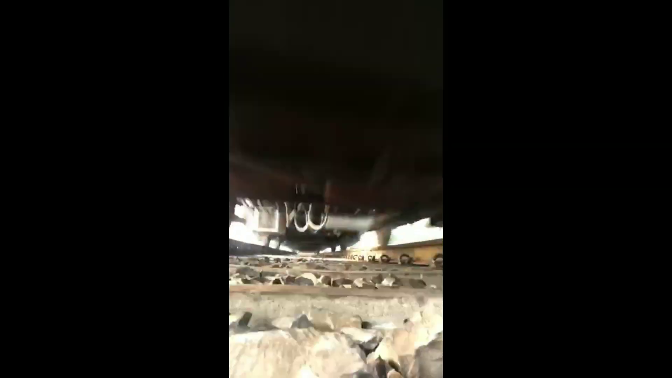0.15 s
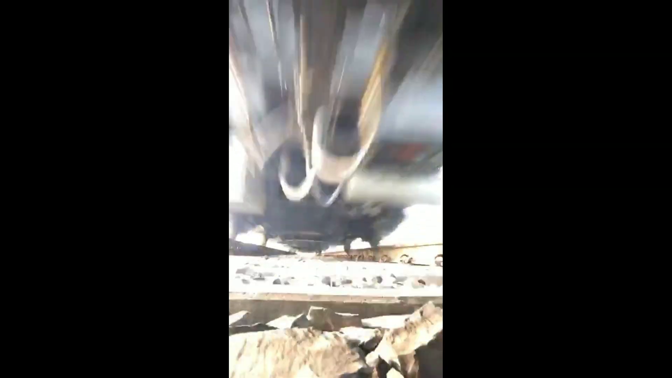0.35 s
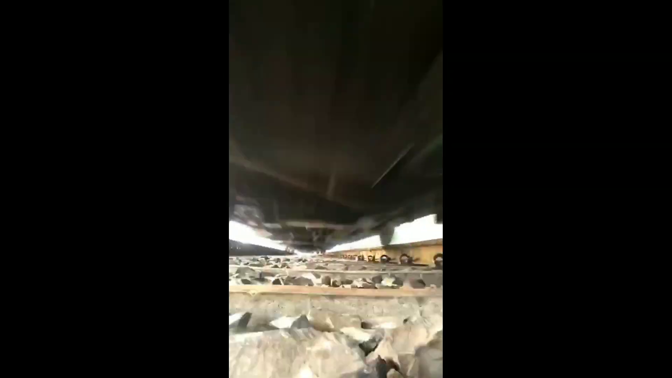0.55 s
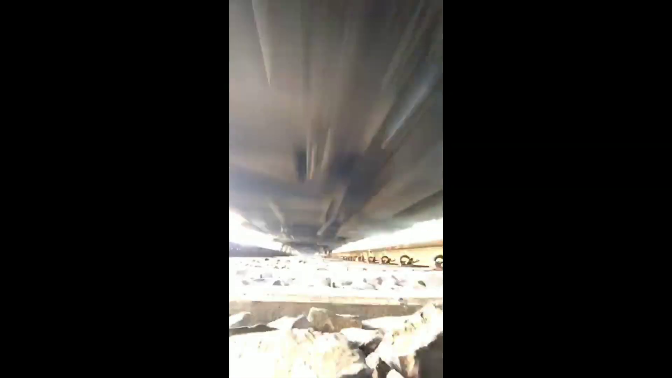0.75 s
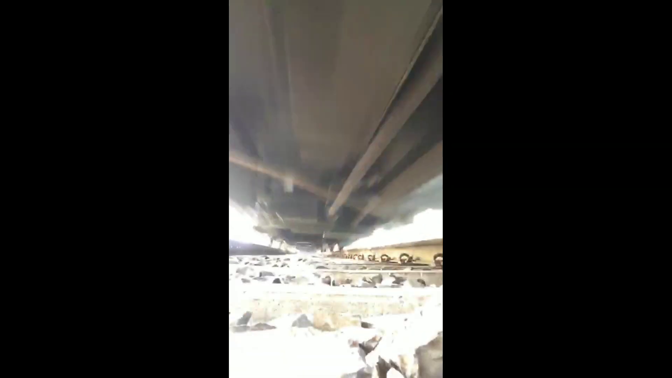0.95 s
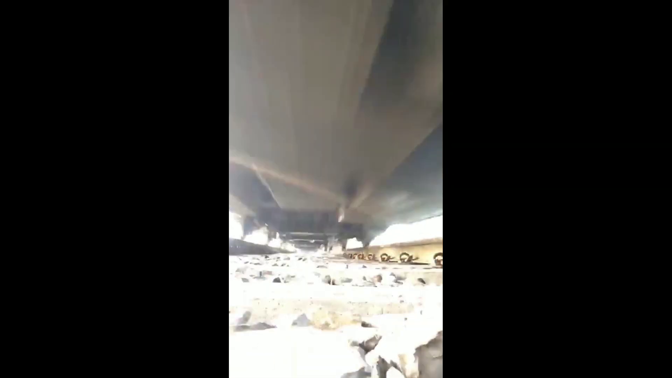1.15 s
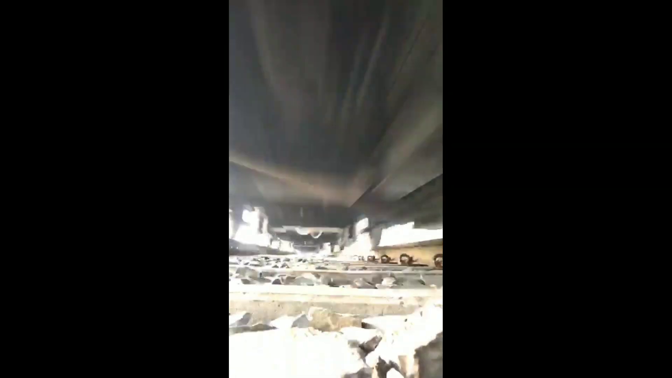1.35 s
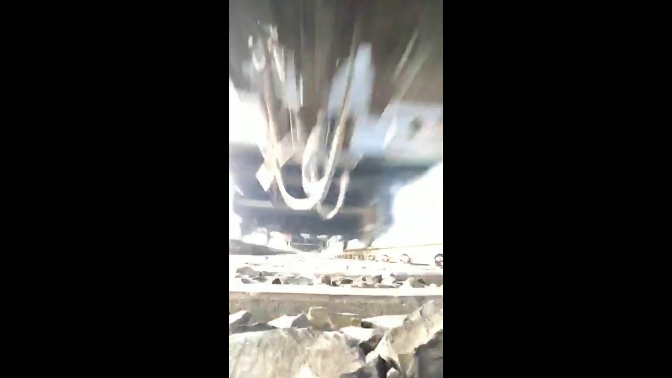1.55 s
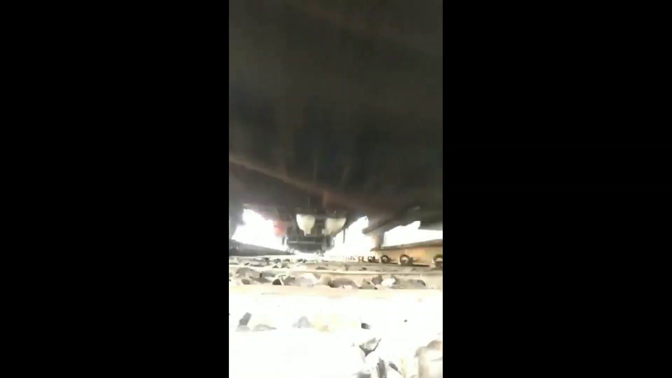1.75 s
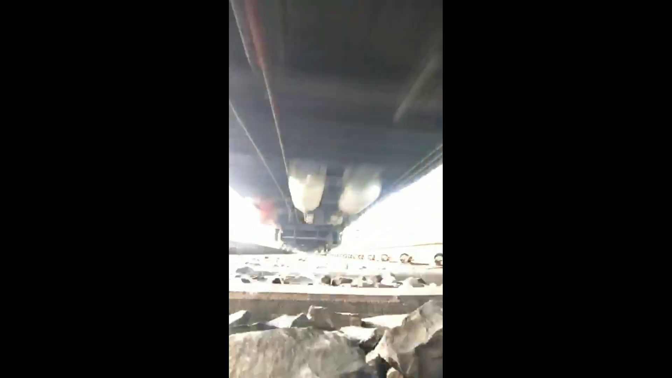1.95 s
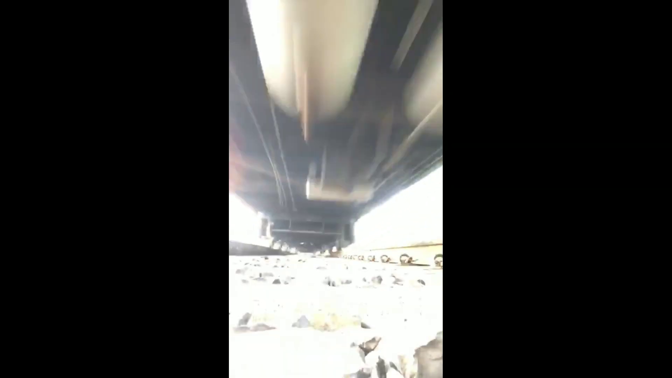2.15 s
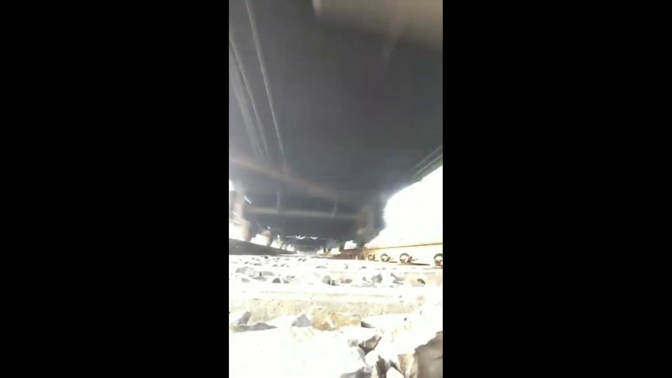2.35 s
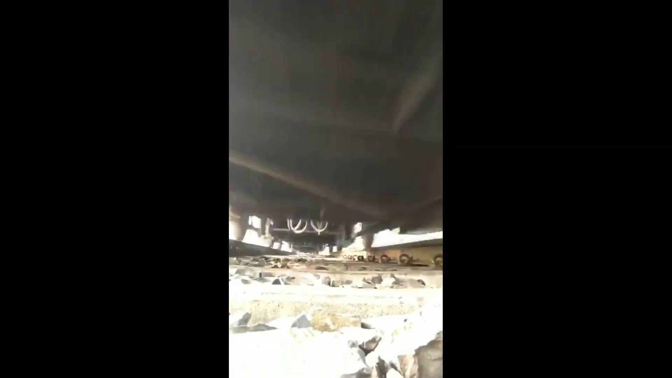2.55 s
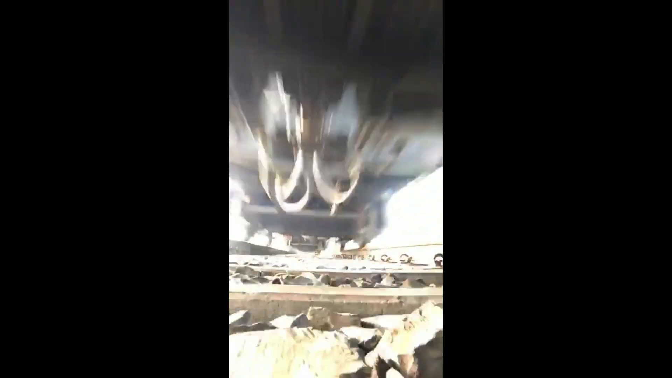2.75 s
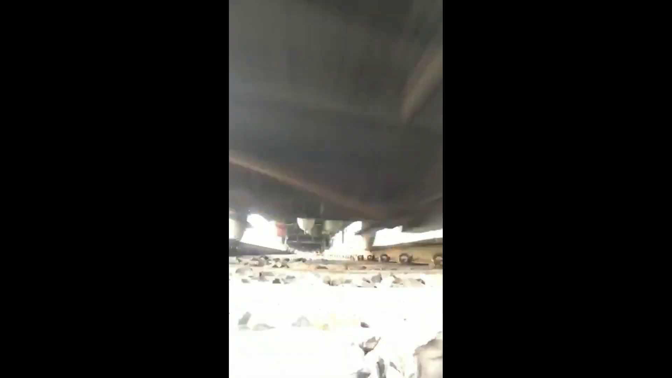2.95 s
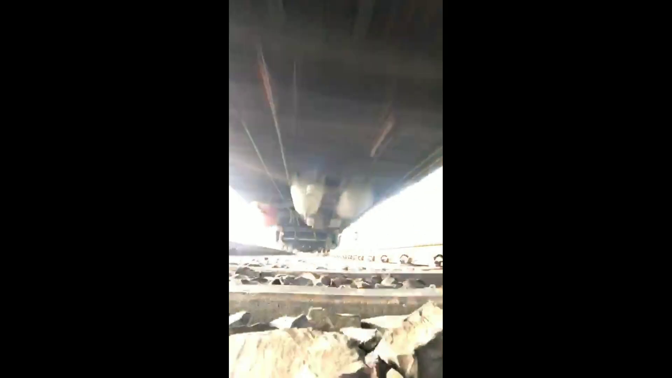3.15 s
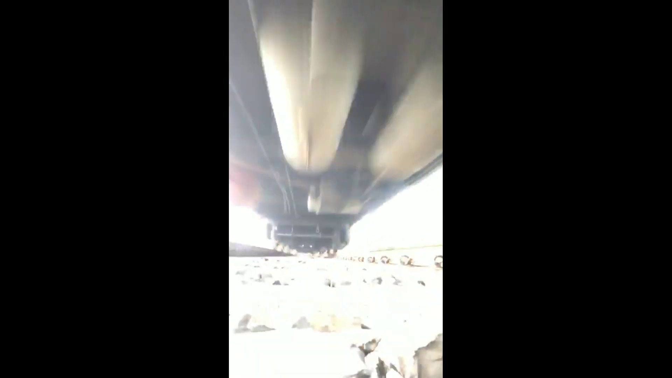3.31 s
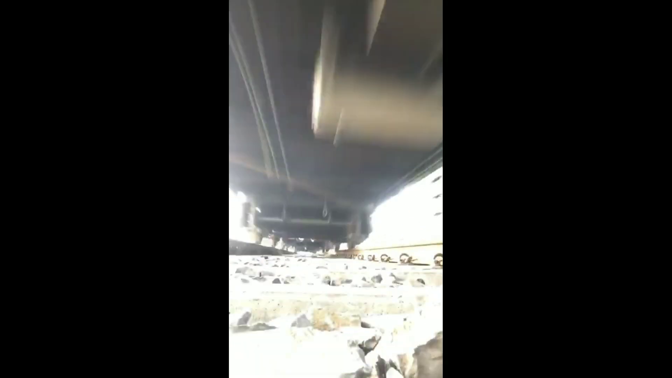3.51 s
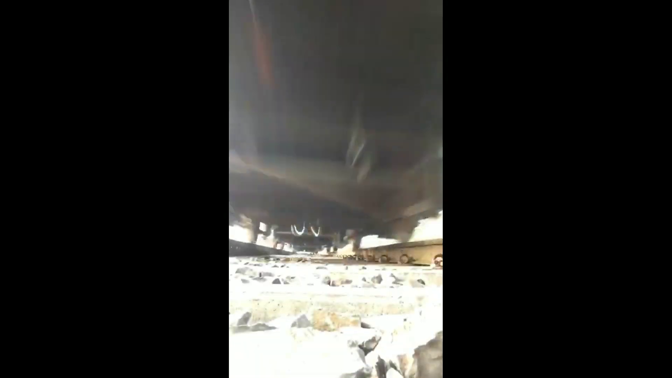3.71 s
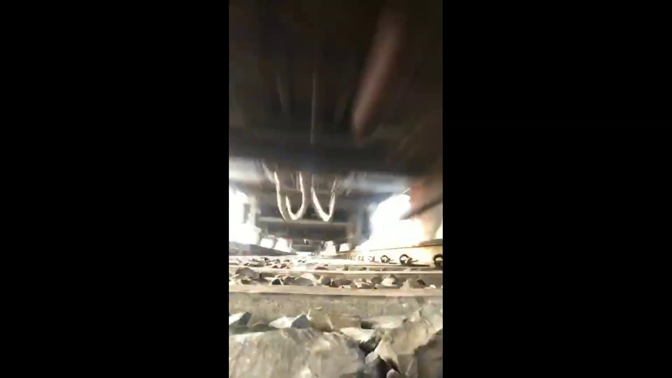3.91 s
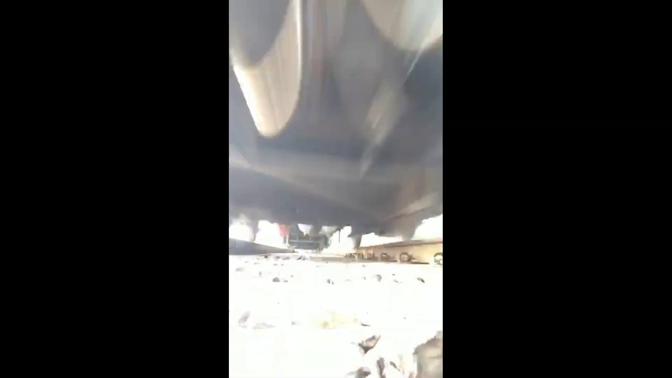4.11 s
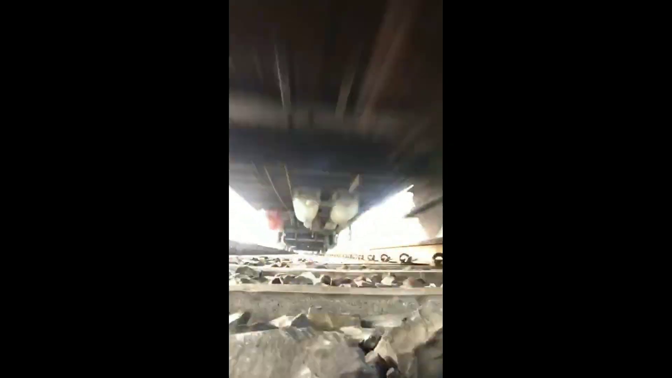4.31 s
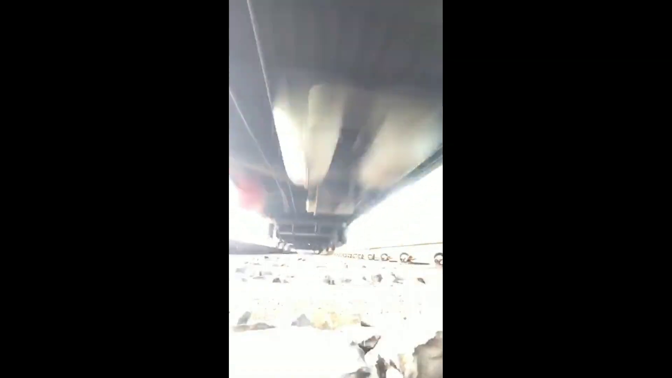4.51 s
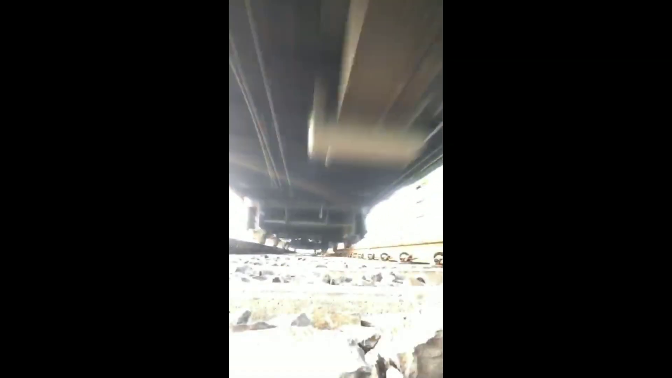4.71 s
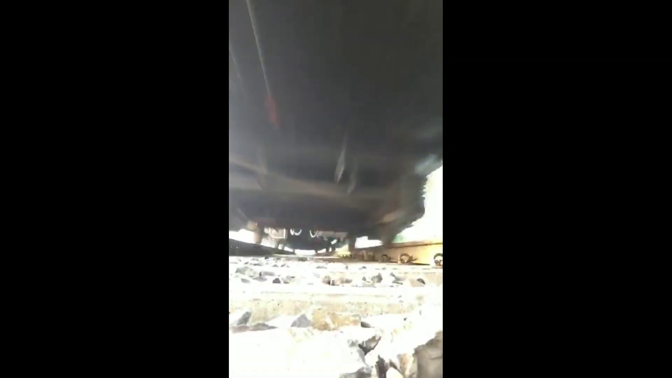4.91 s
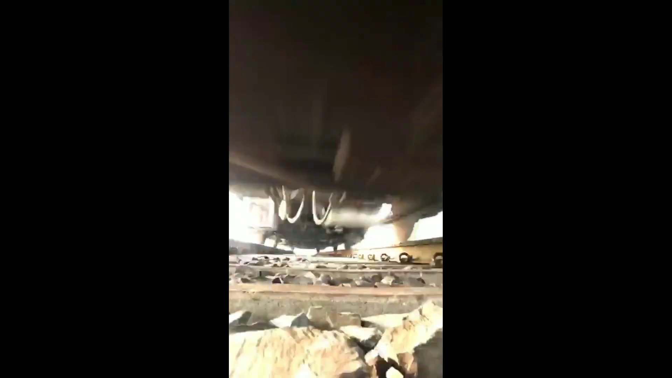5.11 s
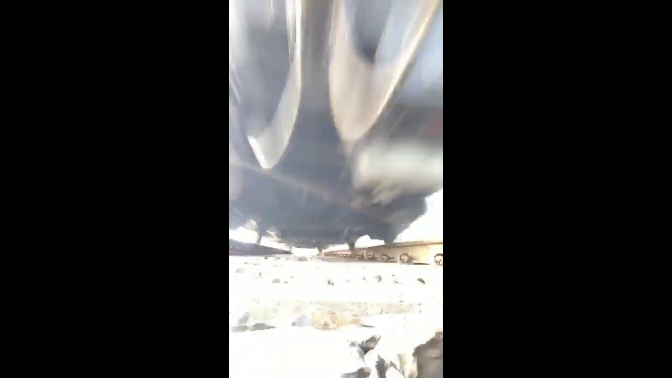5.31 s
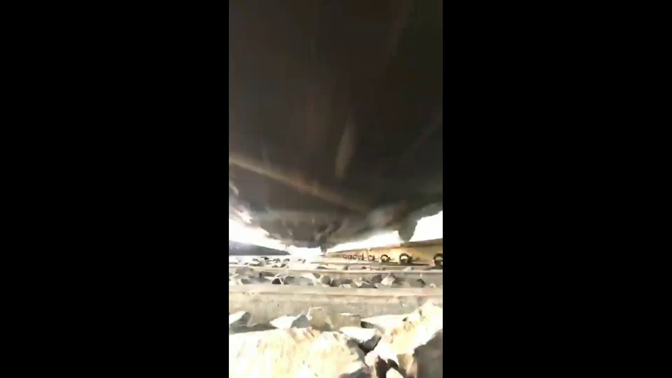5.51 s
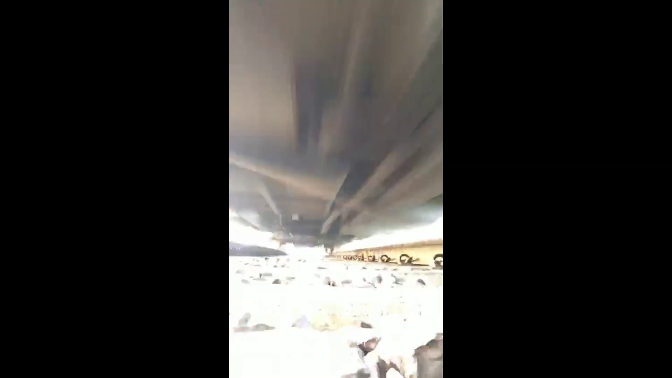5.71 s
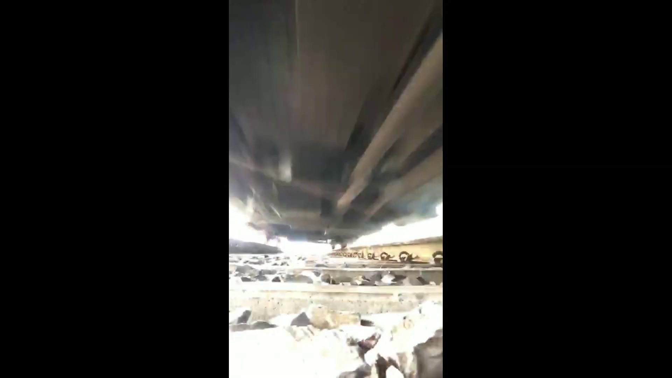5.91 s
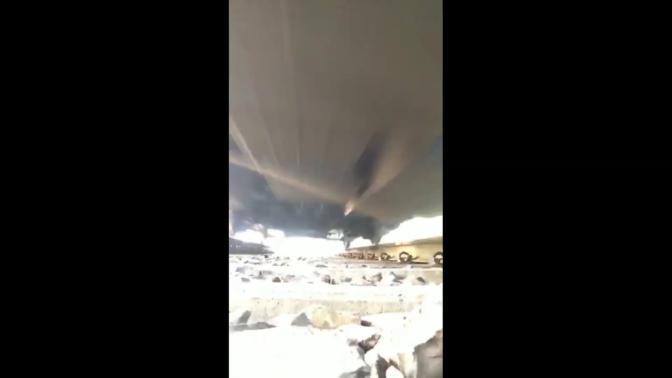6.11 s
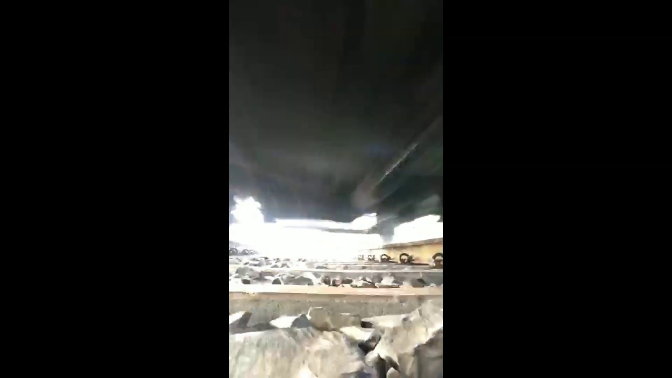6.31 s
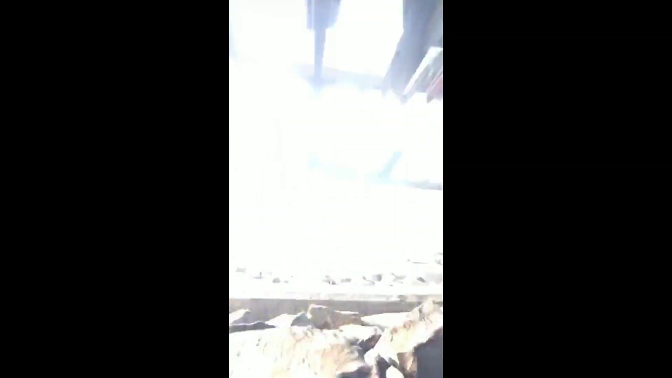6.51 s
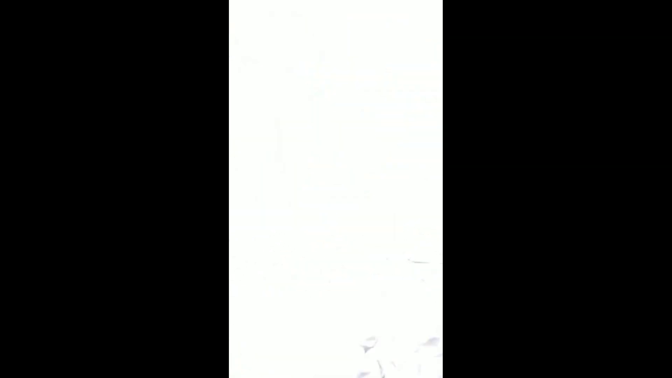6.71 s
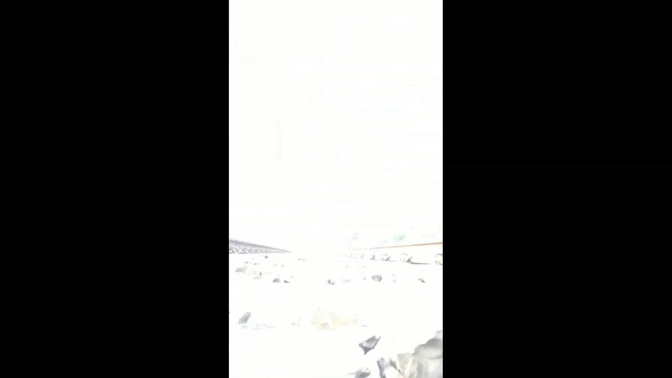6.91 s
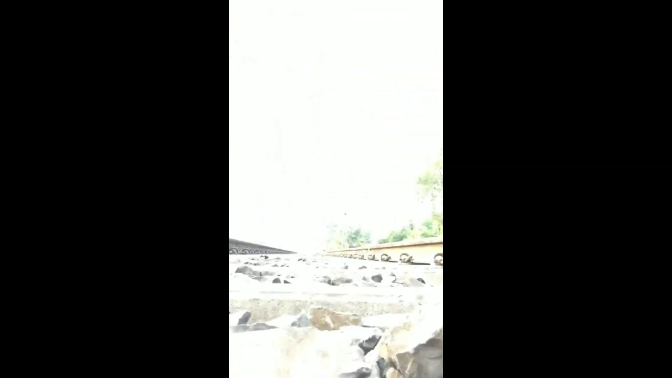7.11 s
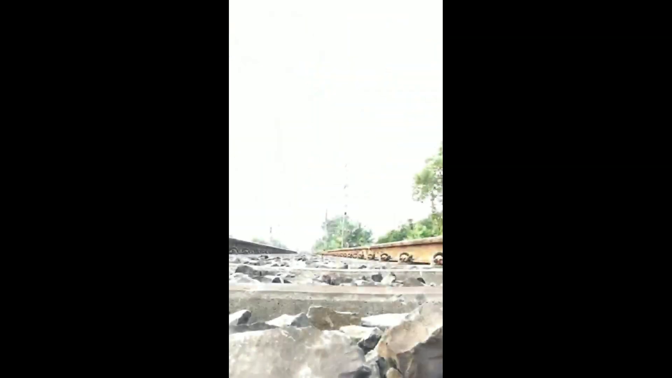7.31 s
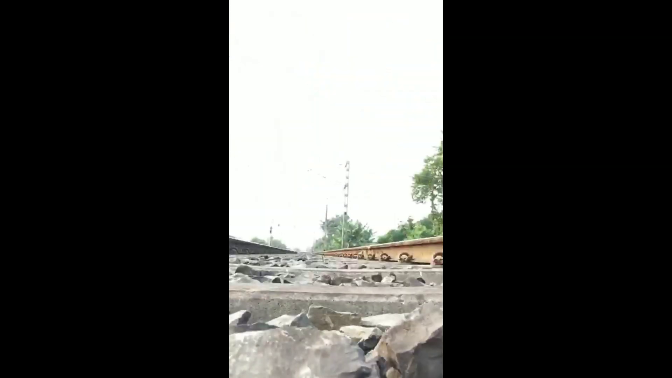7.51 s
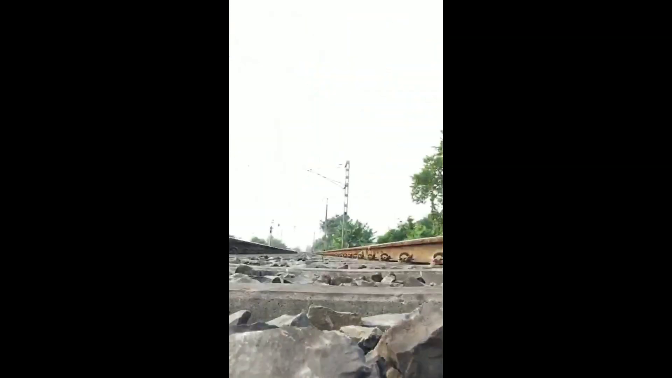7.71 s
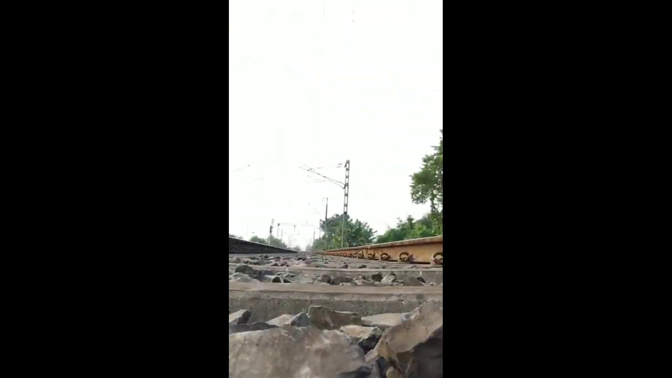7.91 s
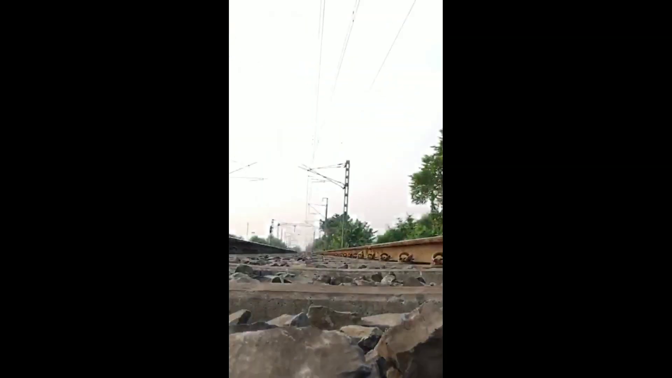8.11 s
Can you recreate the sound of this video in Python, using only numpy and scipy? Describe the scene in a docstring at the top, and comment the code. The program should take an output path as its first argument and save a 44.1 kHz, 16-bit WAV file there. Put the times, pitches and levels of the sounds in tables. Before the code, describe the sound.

An electric commuter train is already passing over a microphone between the rails outdoors. Low air rumble and rolling roar swell before the first hard steel clacks at 0.4 and 0.55 seconds, then 0.8 and 0.95. Similar groups of four blows begin around 1.6, 2.85, 4.05 and 5.3 seconds, each blow brief, ringing and close enough to overload slightly. Dull knocks from farther joints surround them. Roar, metallic singing and hiss surge with each bogie and dip between. A short rough flange squeal peaks near 0.7, another abruptly at 5.8, sagging as the wheel passes. Motor growls deepen around 0.7, 1.5, 5.7 and 6.5; a quick air rush comes at 5.2, a softer one near 6.2. Last clacks fall at 6.55 and 6.7. The train noise drops away; from 7.0 to 7.9 low wake thumps, puffs and dry ticks weaken, leaving residual rumble and faint hiss.

```python
"""A roar of rolling wheels swells over a low rumble, then axle after axle of an electric commuter train
strikes a rail joint close to a microphone between the rails. Decaying steel modes and noise make the blows,
shaped noise the roar, hiss and draught, sines the knocks, and rough partials two short flange squeals.
Motor bogies growl in noise bands; when the last coach has gone, low pushes and puffs of its wake buffet
the microphone and dry ticks sound. A limiter holds down the blows."""
import sys
import numpy as np
from scipy import signal
from scipy.fft import rfft, irfft, next_fast_len
from scipy.io import wavfile
from scipy.ndimage import uniform_filter1d

SR = 44100
rng = np.random.default_rng(int(sys.argv[2]) if len(sys.argv) > 2 else 0)


def pcm_store(signal):
    """Save signal as 16-bit PCM."""
    levels = np.round(np.clip(np.atleast_2d(signal), -1, 1) * 32767)
    wavfile.write(sys.argv[1], SR, levels.astype(np.int16).T)


N = 359415
TIME = np.arange(N) / SR

# Bogies, in pairs either side of each coupling. Each row: time in seconds when the leading axle strikes
# the near joint, relative force in dB, relative roar in dB, relative hiss in dB.
BOGIES = [(0.385, -2.5, -21.5, -42.5), (0.776, 1.5, -18.5, -42), (1.609, -4.5, -18.5, -41.5),
          (2.001, 3.5, -21.5, -46.5), (2.837, -3.5, -21.5, -44.5), (3.230, 3, -20.5, -45),
          (4.066, -3.5, -20.5, -45), (4.461, 2, -20.5, -46), (5.301, -2.5, -21.5, -44),
          (5.697, 0.5, -18.5, -42.5), (6.539, -6, -18, -42.5)]
AXLE_GAP_S = 0.166  # from a bogie's leading axle to its trailing one
# The four axles round a coupling, in turn. Each row: relative force in dB, treble lift in dB,
# 60 dB decay time of the ring in seconds, relative force on the farther joints in dB.
AXLES = [(1, -3.5, 0.064, 0.5), (-4, -3, 0.071, -6.5), (-2, 0.5, 0.073, -6.5), (-3.5, 0, 0.063, -7)]
# Modes of rail and wheel. Each row: nominal frequency in Hz, relative level in dB under a leading axle,
# relative level in dB under a trailing axle.
RAIL_MODES = [(148, -14.5, 6), (274.7, -0.5, 0.5), (597.6, 2, -11.5), (664, -26.5, -2), (832, -8.5, 0),
              (872, -1, -2.5), (910, -6.5, 3.5), (997, -3, -31), (1106.5, -13, 1), (1139.5, -10, 3),
              (1750, -11, -27.5), (1975, -8.5, -13), (2227, -18, -8.5), (2343, -8, -18.5), (2685, -8, -13),
              (3640, -13.5, -22.5), (5200, -18, -28.5), (6680, -17, -23), (9030, -21.5, -17)]
# Spectrum of the dense ringing. Each row: frequency in Hz, relative density in dB per Hz.
CLANG_SPECTRUM = [(40, -13), (120, 0.5), (280, -3.5), (430, -7.5), (620, -3), (1130, -0.5), (1420, -15.5),
                  (2400, -13), (3800, -16.5), (4800, -23), (6400, -24), (11500, -33)]
# The wheel bounces on the rail end, each time weaker.
BOUNCE_S, BOUNCE_DB, THUMP_HZ, THUMP_DB = 0.00771, -2, 192, -4.5
# Farther joints that every axle also strikes. Each row: delay after the near joint in seconds,
# relative force in dB, nominal pitch in Hz, treble of the rattle in dB.
FAR_JOINTS = [(-0.402, -14, 646, 5), (-0.322, -9, 457.4, 2), (0.238, -20, 340, -10)]

# Spectra of the rolling roar, the singing steel and the hiss under the floor.
# Each row: frequency in Hz, relative density in dB per Hz.
ROAR_SPECTRUM = [(100, -6), (200, 2.5), (320, -0.5), (560, -2), (700, -3.5), (880, -5.5), (1080, -3.5),
                 (1200, -13), (1400, -20.5), (2500, -43), (6000, -83.5)]
SING_SPECTRUM = [(900, -21.5), (1350, -3.5), (1750, 1), (2180, 4), (2500, 1), (3100, -3.5), (3850, -5),
                 (4800, -18.5), (8000, -49)]
HISS_SPECTRUM = [(2000, -34), (4000, 3), (4900, 0.5), (5800, 1), (7700, -4), (9700, -6), (10400, -10.5),
                 (11400, -11), (12500, -26.5)]
OVERHEAD_S = -0.014  # a bogie is loudest this long from its first clack
ROAR_SLOPES_DB_PER_S = (21.5, 29)  # rise as a bogie nears, fall as it leaves
HISS_SLOPES_DB_PER_S = (22.5, 41)
TAIL_S, TAIL_FADE_S, TAIL_DROP_DB = 6.75, 0.025, 16  # once the last floor has gone, the hiss escapes upwards

# Flanges rubbing the rail. Each row: time in seconds when the wheel passes, pitch in Hz on approach,
# relative level in dB, build-up in dB per second, roughness from 0 to 1 on approach.
SQUEALS = [(0.695, 1105, -14, 48.5, 0.24), (5.797, 1077, -17.5, 419.5, 0.5)]
# Spectrum of the scraping steel. Each row: frequency in Hz, relative density in dB per Hz.
SCRAPE_SPECTRUM = [(1200, -25), (2200, 2), (3300, 0.5), (4500, -6), (7000, -13.5), (12000, -28.5)]
# Each row: multiple of the squeal's pitch, relative level in dB.
SQUEAL_PARTIALS = ((0.5, 1.5), (2, -7.5), (3, -24), (4, -22))
SQUEAL_SAG, SQUEAL_PASS_S, SQUEAL_FADE_DB_PER_S = 0.056, 0.024, 329  # sag is a share of the pitch

# Deep growls of the motor bogies going over. Each row: middle in seconds, half-length in seconds,
# level in dB, pitch in Hz.
MOTORS = [(0.72, 0.3, -22.5, 255), (1.515, 0.2, -22.5, 219), (5.73, 0.3, -22, 247), (6.487, 0.14, -20, 296)]
# Spectrum of a growl. Each row: multiple of the pitch, relative density in dB per Hz.
GROWL_SPECTRUM = [(0.5, -22), (1, 14.5), (1.3, 11.5), (2, -2), (3.2, -36.5)]
# Bright rushes of air from equipment under the floor. Each row: middle in seconds, half-length in seconds,
# level in dB.
RUSHES = [(5.2, 0.019, -32.5), (6.17, 0.15, -37.5)]
# Spectrum of the rushes. Each row: frequency in Hz, relative density in dB per Hz.
RUSH_SPECTRUM = [(3000, -7), (6000, -2), (9000, -3), (11500, -5.5)]

# Air dragged along by the train. Each row: time in seconds, relative level in dB.
DRAUGHT = [(0.0, -18), (0.38, -28.5), (0.7, -17.5), (1.2, -25), (1.47, -18.5), (2.0, -23.5), (3.88, -19.5),
           (4.13, -26.5), (5.11, -19.5), (6.94, -27), (7.13, -23.5), (8.15, -26)]
# The strongest gusts in it. Each row: time in seconds, relative level in dB.
GUSTS = [(0.74, -22), (1.55, -22), (1.83, -13), (2.02, -13), (2.258, -11.5), (2.381, -16.5), (2.65, -12.5),
         (3.07, -20), (3.33, -18), (3.42, -10.5), (3.67, -13), (3.82, -13.5), (4.46, -11), (5.48, -17),
         (5.72, -13), (6.22, -12), (6.99, -15.5), (7.13, -11)]
GUST_HALF_S = 0.027
# Spectrum of the moving air. Each row: frequency in Hz, relative density in dB per Hz.
WIND_SPECTRUM = [(18, -47.5), (30, -14.5), (41, -5), (56, 4), (100, -2), (170, -9), (260, -18),
                 (450, -21.5), (1000, -29), (1500, -40), (3500, -64.5), (6000, -64), (12000, -92)]
# Eddies of the wake hitting the microphone. Each row: time in seconds, relative force in dB,
# relative puff level in dB.
BUFFETS = [(6.971, 1, -15.5), (7.029, -2, -19.5), (7.106, 11, -12), (7.136, 2, -23), (7.234, -1, -20.5),
           (7.308, -2, -36), (7.364, 2.5, -21), (7.471, -10, -19.5), (7.542, -3.5, -24), (7.574, -8, -26.5),
           (7.633, -12, -36), (7.724, -14, -29), (7.785, -12, -26.5), (7.929, -17, -27.5)]
# Spectrum of a puff. Each row: frequency in Hz, relative density in dB per Hz.
PUFF_SPECTRUM = [(60, -8), (200, 14.5), (500, -1.0), (1100, -11.5), (1500, -21.0), (2200, -32),
                 (4000, -49.0), (9000, -60.5)]
# Sharp ticks among the gusts. Each row: time in seconds, relative level in dB.
TICKS = [(6.977, -19.5), (7.048, -19.5), (7.071, -18), (7.27, -24), (7.365, -27), (7.391, -20.5),
         (7.4, -19), (7.484, -26)]
# Spectrum of a tick. Each row: frequency in Hz, relative density in dB per Hz.
TICK_SPECTRUM = [(200, -17), (600, 18.5), (1150, 7), (1600, -0.5), (2600, -15), (5000, -40.5), (9000, -51)]
# Spectrum of the faint outdoor hiss. Each row: frequency in Hz, relative density in dB per Hz.
OUTDOOR_SPECTRUM = [(500, -1.5), (2000, -4.0), (4000, -8), (6000, -12.5), (12000, -18.5)]
EDGE_HZ = 12000  # top of the output band


def clacks(alike=0.59, ring_db=-2.5, clang_db=1.0, shelf_hz=1800):
    """Modal excitation: every axle hits the same joint, so blows resemble each other, every second one most."""
    t, out = np.arange(SR // 3) / SR, np.zeros(N)
    hz, *axle_db = np.transpose(RAIL_MODES)
    phases = rng.random((2, len(hz), 1))
    common = clang(t, 0.097), clang(t, 0.092)
    for k, (s, bogie_db, force_db, lift_db, t60, _) in enumerate(axles()):
        place = k % 2  # 0 leading, 1 trailing
        detune, shift, strike = rng.standard_normal((3, len(hz), 1))  # no two wheels are quite alike
        cycles = hz[:, None] * (1 + 0.007 * detune) * t + phases[place] + 0.2 * shift
        modes = amp(1.5 * strike) * np.sin(2 * np.pi * cycles)
        ring = amp(axle_db[place]) @ modes * burst(t, 0.001, t60)
        dense = np.sqrt(alike) * common[place] + np.sqrt(1 - alike) * clang(t, t60)
        blow = amp(ring_db) * ring + amp(clang_db) * dense + thump(t)
        body = lowpass(blow, shelf_hz, order=1)
        treble = blow - body
        # a heavier bogie adds body rather than treble
        add(out, s, amp(force_db) * (amp(bogie_db) * body + amp(lift_db) * treble))
    return out


def clang(t, t60):
    """Double impact: the wheel leaves one rail end and lands on the next; a tail bounces off floor and ballast."""
    landing = np.maximum(t - 0.006, 0)
    envelope = np.hypot(burst(t, 0.00081, t60), amp(0.5) * burst(landing, 0.0013, t60))
    impact = envelope * noise(CLANG_SPECTRUM, size=len(t))
    tail = amp(-13) * burst(t, 0.0037, 0.24) * noise(CLANG_SPECTRUM, size=len(t))
    return impact + tail


def thump(t):
    """Load transfer: the sleeper takes the wheel's weight in three quick, low pushes."""
    bounce = np.arange(3)
    cycles = (t - 0.004 - BOUNCE_S * bounce[:, None]) * THUMP_HZ
    pushes = np.cos(2 * np.pi * cycles) * np.exp(-(cycles / 0.57) ** 2)
    return amp(THUMP_DB + BOUNCE_DB * bounce) @ pushes


def axles():
    """Periodic impact: each axle's time and bogie force, then the traits of its place at the coupling."""
    rows = []
    for b, (s, bogie_db, _, _) in enumerate(BOGIES):
        for k in (0, 1):
            rows.append((s + k * AXLE_GAP_S, bogie_db, *AXLES[(2 * b + k) % len(AXLES)]))
    return rows


def knocks(ring_db=-2.0, rattle_db=-4.5, pitch_spread_db=0.7):
    """Distant impact: the same axles on farther joints give a short, dull thud with a little rattle on top."""
    t, out = np.arange(SR // 4) / SR, np.zeros(N)
    for s, *_, axle_db in axles():
        for delay, db, hz, treble_db in FAR_JOINTS:
            pitch = hz * amp(pitch_spread_db * rng.standard_normal())
            thud = np.sin(2 * np.pi * pitch * t) * burst(t, 0.0021, 0.095)
            treble = amp(-20.5) * noise(SING_SPECTRUM, size=len(t)) + amp(-32.5) * noise(HISS_SPECTRUM, size=len(t))
            rattle = noise(ROAR_SPECTRUM, size=len(t)) + amp(treble_db) * treble
            rattle = rattle * burst(t, 0.002, 0.19)
            if s + delay > 0:
                add(out, s + delay, amp(db + axle_db) * (amp(ring_db) * thud + amp(rattle_db) * rattle))
    return out


def rolling(roar_trim_db=-2.05, sing_trim_db=-3.5, hiss_trim_db=-0.2):
    """Roughness excitation: treads shake the rails into a roar and a higher singing; hiss fills the underfloor."""
    s, _, roars, hisses = np.transpose(BOGIES)
    roar_db = passing(s, roars, ROAR_SLOPES_DB_PER_S)
    tail_drop_db = TAIL_DROP_DB * np.clip((TIME - TAIL_S) / TAIL_FADE_S, 0, 1)
    hiss_db = passing(s, hisses, HISS_SLOPES_DB_PER_S) - tail_drop_db
    sing_db = (roar_db + hiss_db) / 2
    judder = wander(32)  # rough patches on the rail reach all bands together
    roar = patchy(noise(ROAR_SPECTRUM), patch_db=1.5) * amp(roar_db + roar_trim_db + 1.3 * judder)
    sing = patchy(noise(SING_SPECTRUM), patch_db=2.2) * amp(sing_db + sing_trim_db + 0.42 * judder)
    hiss = patchy(noise(HISS_SPECTRUM), patch_db=4.0) * amp(hiss_db + hiss_trim_db + 0.93 * judder)
    return (roar + sing) * jolts() + hiss


def passing(times, levels_db, slopes):
    """Power summation: the level in dB of all bogies together, each swelling as it nears and fading as it leaves."""
    rise, fall = slopes
    grid = TIME[::SR // 400]
    since = grid - times[:, None] - OVERHEAD_S
    each = amp(levels_db[:, None] + np.minimum(rise * since, -fall * since))
    return np.interp(TIME, grid, 10 * np.log10((each ** 2).sum(0)))


def patchy(x, patch_db):
    """Spectral fluctuation: narrow bands swell and sink on their own for a few hundredths of a second."""
    z = signal.stft(x, nperseg=1024, noverlap=768)[2]
    field = uniform_filter1d(rng.standard_normal(z.shape), size=4, axis=0)  # across frequency
    field = uniform_filter1d(field, size=7, axis=1)  # along time
    return unit(signal.istft(z * amp(patch_db * unit(field)), nperseg=1024, noverlap=768)[1][:N])


def jolts(per_s=16, size=0.64):
    """Impulse response: a gain curve in which chance bumps in the track each shake the running gear briefly."""
    bumps = (rng.random(N) < per_s / SR) * np.minimum(rng.exponential(size=N), 2)
    shaking = signal.oaconvolve(bumps, burst(TIME[:SR // 8], 0.001, 0.07))[:N]
    return unit(1 + size * shaking)


def squeal(waver=0.018, smear=0.57, scrape_db=-12.0, rough_past=1.5):
    """Stick-slip: as the wheel passes, the tone sags and a rasp grows at its half-pitch and overtones."""
    t, out = np.arange(SR) / SR, np.zeros(N)
    for s, hz, db, build, rough_before in SQUEALS:
        start = max(s - 0.6, 0)
        since = t + start - s
        past = (1 + np.tanh(since / SQUEAL_PASS_S / 2)) / 2  # 0 before the wheel passes, 1 after
        rough = np.clip(rough_before + (rough_past - rough_before) * past, 0, 1)
        pitch = hz * (1 - SQUEAL_SAG * past) * (1 + waver * rough * wander(120, size=SR))
        turns = np.cumsum(pitch) / SR
        phase = 2 * np.pi * turns
        slips = smear * rough * wander(160, size=SR)  # uneven slips blur the higher partials most
        rasp = sum(amp(level + 2 * wander(60, size=SR)) * np.sin(k * (phase + slips))
                   for k, level in SQUEAL_PARTIALS)
        flutter = amp(2.3 * wander(40, size=SR))
        # each slip scrapes the steel
        scrape = amp(scrape_db) * noise(SCRAPE_SPECTRUM, size=SR) * (1 + np.cos(phase)) / 2
        tone = flutter * np.sin(phase + slips) + np.sqrt(rough) * (rasp + scrape)
        level_db = db + np.minimum(build * since, -SQUEAL_FADE_DB_PER_S * since)
        add(out, start, tone * amp(level_db))
    return out


def underfloor():
    """Band-limited noise sources: growling motor bogies and rushing air."""
    growl = np.zeros(N)
    for s, half, db, hz in MOTORS:
        growl += swells([(s, half, db)], [(k * hz, level) for k, level in GROWL_SPECTRUM])
    return growl + swells(RUSHES, RUSH_SPECTRUM)


def swells(rows, spectrum):
    """Amplitude modulation: noise that grows and fades as each part of the train goes over."""
    return noise(spectrum) * sum(amp(db) * np.exp(-((TIME - s) / half) ** 2) for s, half, db in rows)


def draught(split_hz=260, calm_from=6.95, calm_db_per_s=5, steady_db=1.5, gust_db=1.5):
    """Turbulence: air and ground rumble swell in gusts; the upper part crackles and dies as the wake calms."""
    air = noise(WIND_SPECTRUM)
    low = lowpass(air, split_hz, order=4)
    low /= np.sqrt(uniform_filter1d(low ** 2, size=4000) + 1e-6)  # an even rumble for the gusts to shape
    upper = signal.sosfilt(signal.butter(4, split_hz, "high", fs=SR, output="sos"), air)
    steady = amp(np.interp(TIME, *np.transpose(DRAUGHT)) + steady_db + 0.59 * wander(5.1))
    gusts = amp(gust_db) * sum(amp(db) * np.exp(-((TIME - s) / GUST_HALF_S) ** 2) for s, db in GUSTS)
    calm_db = calm_db_per_s * np.maximum(TIME - calm_from, 0)
    eddies = wander(24)
    rumble = low * amp(1.85 * eddies)
    crackle = upper * amp(0.5 - calm_db + 2.6 * eddies + 2.0 * wander(160))
    return np.hypot(steady, gusts) * (rumble + crackle)


def buffets(push_db=-2.5, push_hz=95, puff_db=5.0):
    """Vortex impact: each eddy gives a low push and a brief puff of noise."""
    t, out = np.arange(SR // 5) / SR, np.zeros(N)
    for s, db, breeze_db in BUFFETS:
        pitch = push_hz * amp(rng.standard_normal())  # scattered by about an eighth
        push = np.sin(2 * np.pi * pitch * t) * burst(t, 0.0017, 0.056)
        puff = noise(PUFF_SPECTRUM, size=len(t)) * burst(t, 0.0011, 0.1)
        add(out, s, amp(db + push_db) * push + amp(breeze_db + puff_db) * puff)
    return out


def ticks(level_db=1.0):
    """Impulsive noise: dry ticks of a few milliseconds, perhaps grit stirred by the wake."""
    t, out = np.arange(SR // 20) / SR, np.zeros(N)
    snap = burst(t, 0.0004, 0.025)
    for s, db in TICKS:
        add(out, s, amp(db + level_db) * noise(TICK_SPECTRUM, size=len(t)) * snap)
    return out


def outdoor_hiss():
    """Ambient noise: a faint, steady outdoor hiss."""
    return amp(-72.5) * noise(OUTDOOR_SPECTRUM)


def amp(db):
    """Logarithmic level: decibels to gain."""
    return 10 ** (np.asarray(db) / 20)


def unit(x):
    """Normalisation: scales to rms 1."""
    return x / np.sqrt(np.mean(x ** 2) + 1e-20)


def add(mix, s, sound):
    """Superposition: mixes a sound in at time s."""
    part = mix[max(round(s * SR), 0):][:len(sound)]
    part += sound[:len(part)]


def read(points, hz):
    """Interpolation on a logarithmic frequency axis: a spectrum's dB at any frequency."""
    f, db = np.transpose(points)
    return np.interp(np.log(hz + 1), np.log(f), db)


def noise(points, size=N):
    """Spectral shaping: noise of rms 1 with the given spectrum."""
    padded = next_fast_len(size)
    hz = np.fft.rfftfreq(padded, 1 / SR)
    white = rfft(rng.standard_normal(padded))
    return unit(irfft(white * amp(read(points, hz)), padded)[:size])


def lowpass(x, hz, order=2):
    """Low-pass filtering: keeps what lies below hz."""
    return signal.sosfilt(signal.butter(order, min(hz, SR / 2 - 1), fs=SR, output="sos"), x)


def wander(rate_hz, size=N):
    """Band-limited chance of rms 1, changing up to about rate_hz times a second."""
    return unit(lowpass(rng.standard_normal(size + SR), rate_hz)[SR:])


def burst(t, rise, t60):
    """Exponential decay: the envelope of a blow, a quick rise and then 60 dB of fall in t60 seconds."""
    return (1 - np.exp(-t / rise)) * amp(-60 * t / t60)


def scene(air_top_hz=4200):
    """Superposition of everything heard from the track bed."""
    train = clacks() + knocks() + rolling() + squeal() + underfloor()
    air = lowpass(draught() + buffets() + ticks(), air_top_hz)  # wind on the microphone has little treble
    return (train + air + outdoor_hiss())[None]


def record(dry, threshold_db=-8.5, recovery_db_per_s=300):
    """Dynamic compression: a fast limiter, soft overload at full scale, then the band limit."""
    power_db = 10 * np.log10(abs(uniform_filter1d(dry[0] ** 2, size=130)) + 1e-12)
    fall = TIME * recovery_db_per_s
    held_peak_db = np.maximum.accumulate(power_db + fall) - fall  # follows rises at once, falls steadily
    over_db = np.maximum(held_peak_db - threshold_db, 0)
    held = dry * amp(-0.8 * uniform_filter1d(over_db, size=60))
    held = held / (1 + held ** 8) ** (1 / 8)
    band_limit = signal.firwin(255, EDGE_HZ, window=("kaiser", 8), fs=SR)
    return signal.oaconvolve(held, band_limit[None], "same")


dry = scene()
out = record(dry)
pcm_store(out)
```